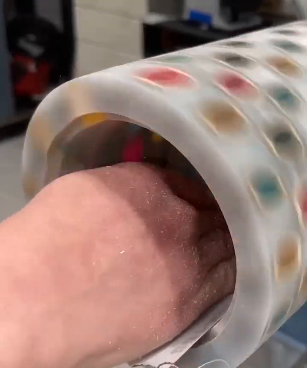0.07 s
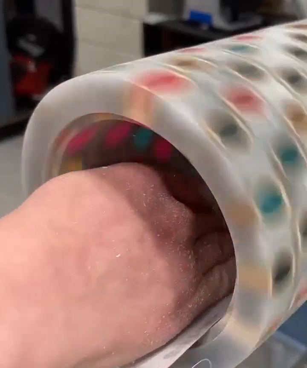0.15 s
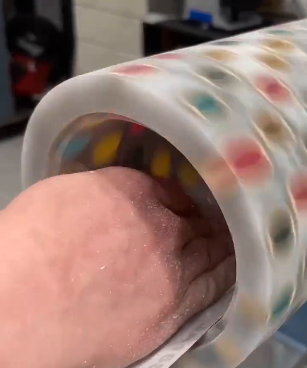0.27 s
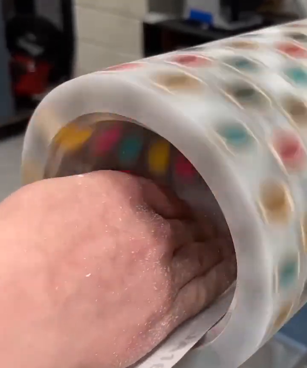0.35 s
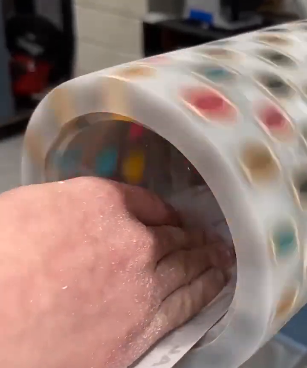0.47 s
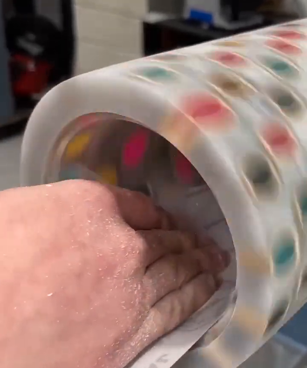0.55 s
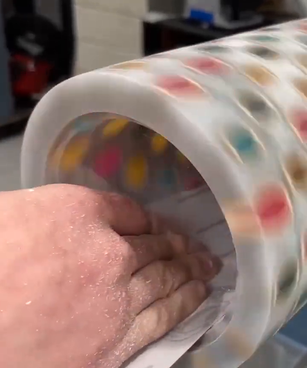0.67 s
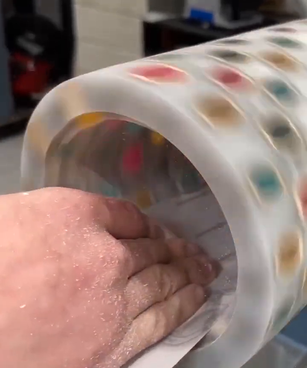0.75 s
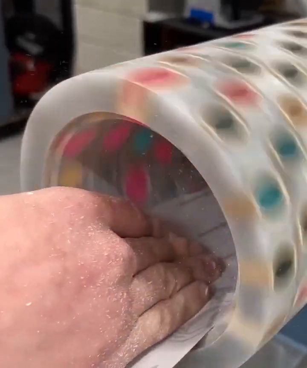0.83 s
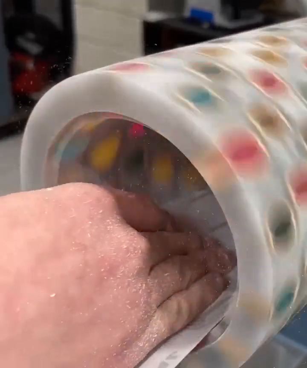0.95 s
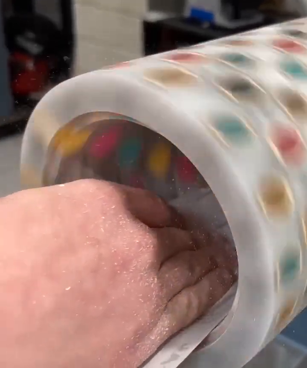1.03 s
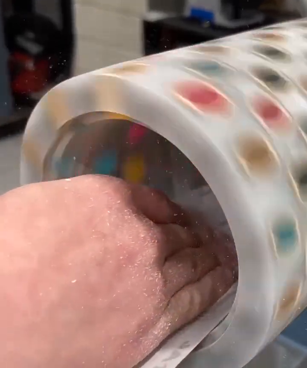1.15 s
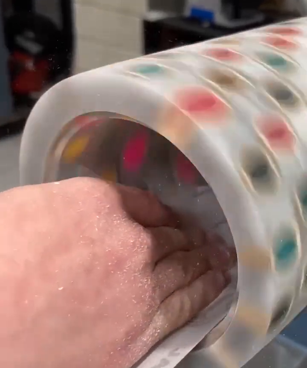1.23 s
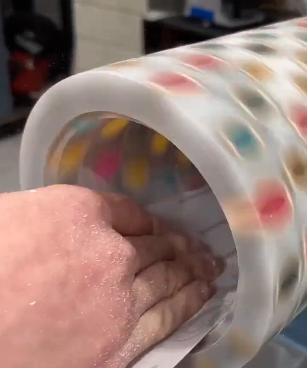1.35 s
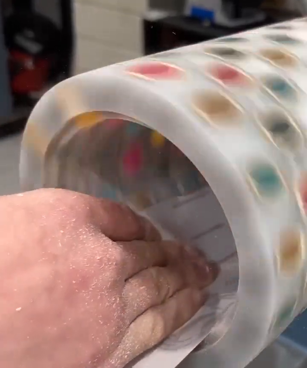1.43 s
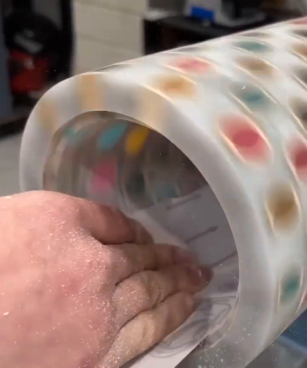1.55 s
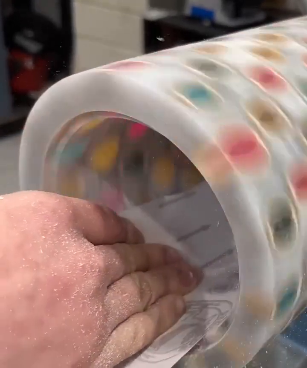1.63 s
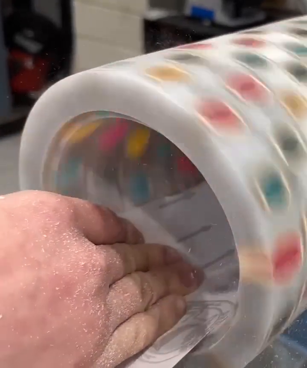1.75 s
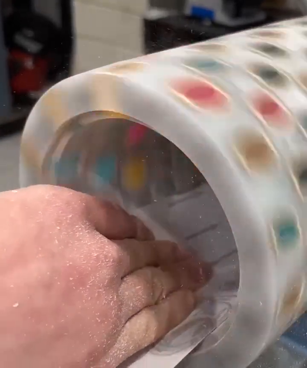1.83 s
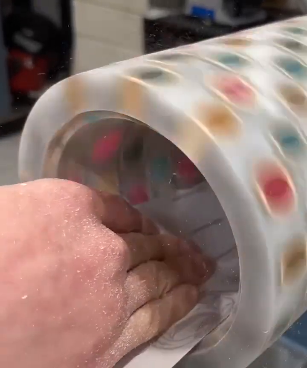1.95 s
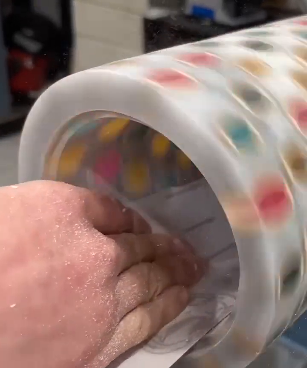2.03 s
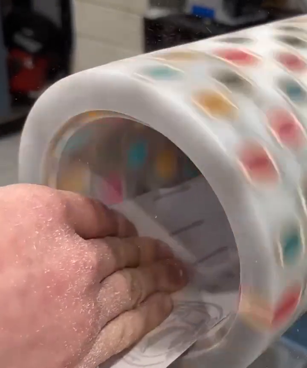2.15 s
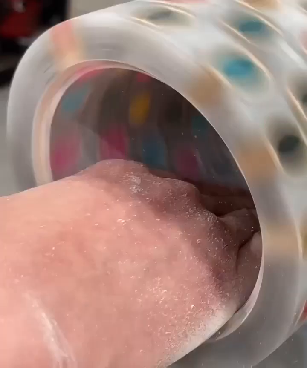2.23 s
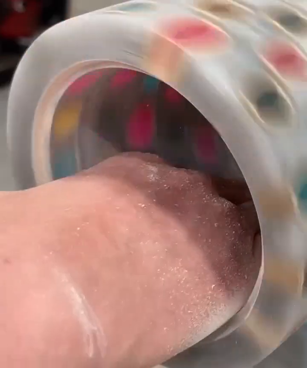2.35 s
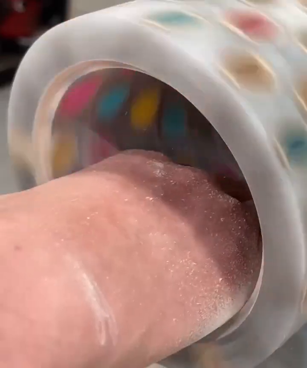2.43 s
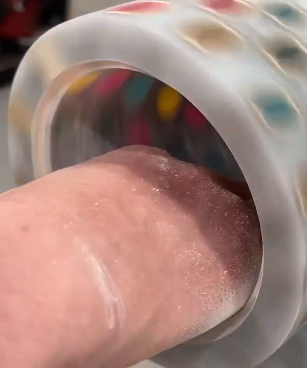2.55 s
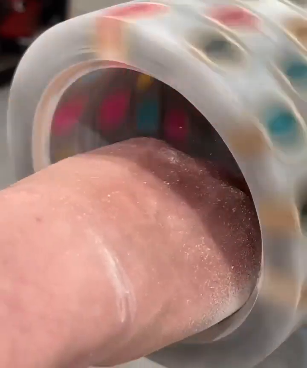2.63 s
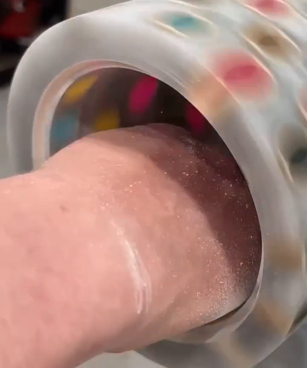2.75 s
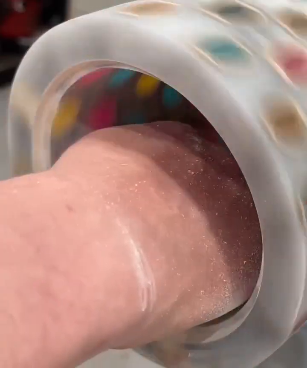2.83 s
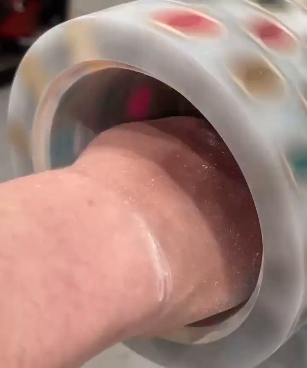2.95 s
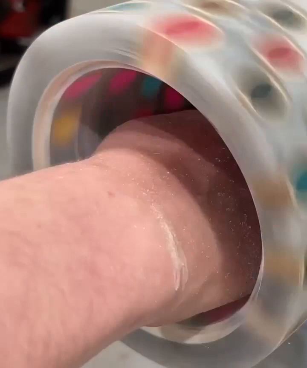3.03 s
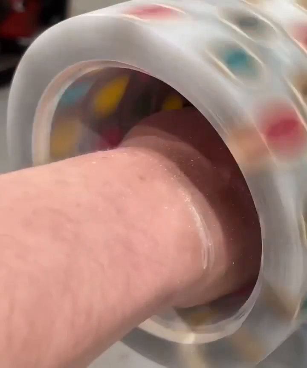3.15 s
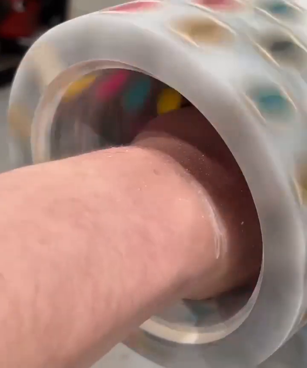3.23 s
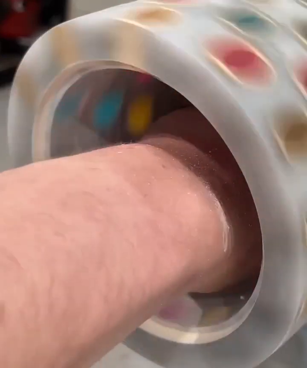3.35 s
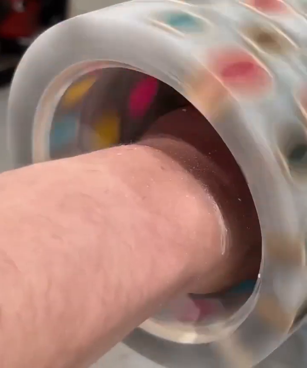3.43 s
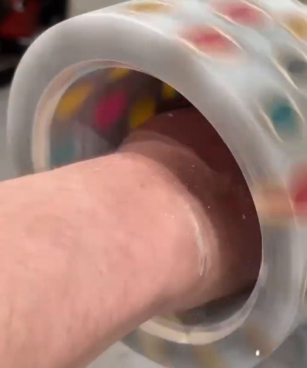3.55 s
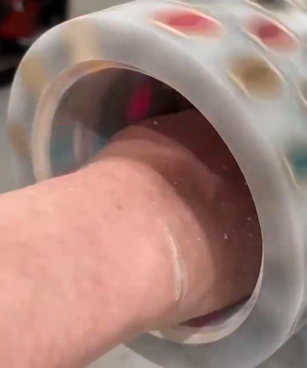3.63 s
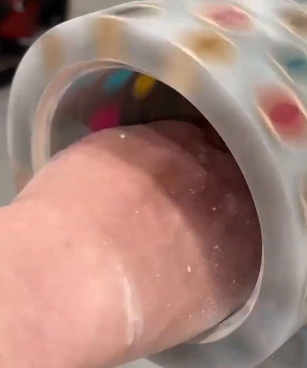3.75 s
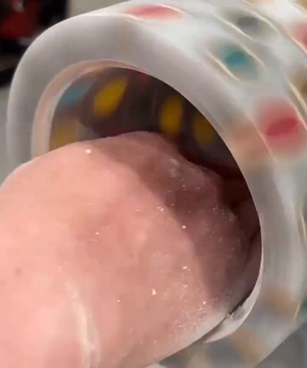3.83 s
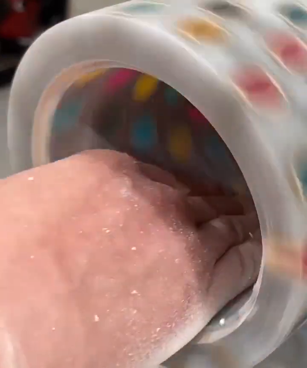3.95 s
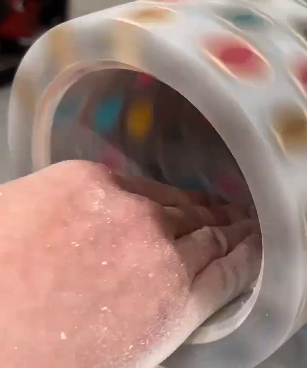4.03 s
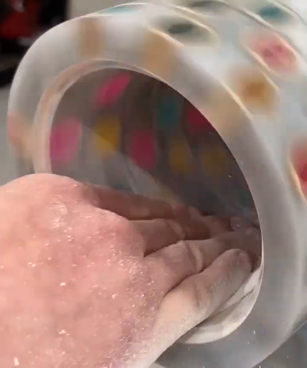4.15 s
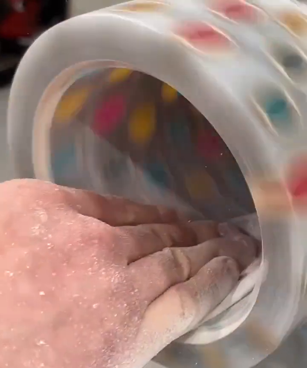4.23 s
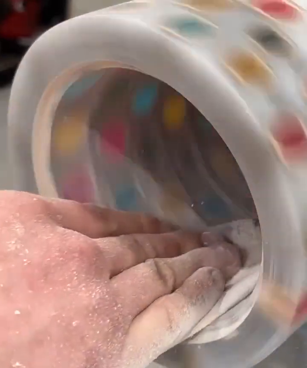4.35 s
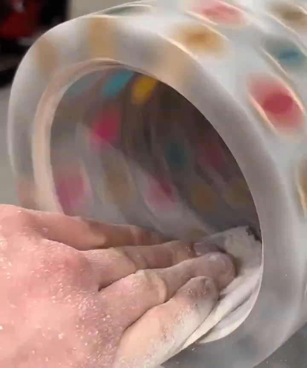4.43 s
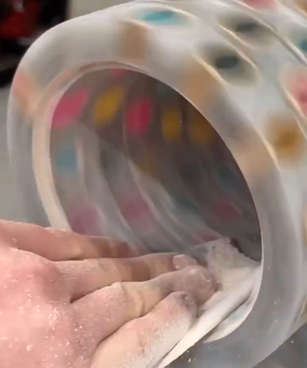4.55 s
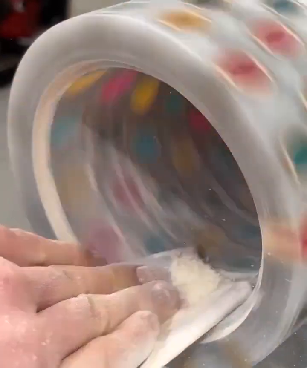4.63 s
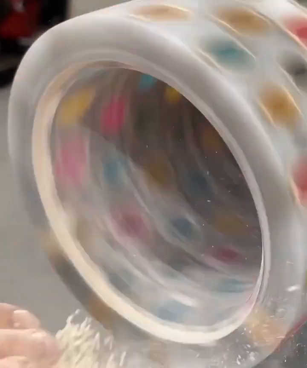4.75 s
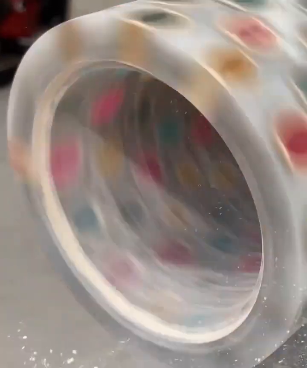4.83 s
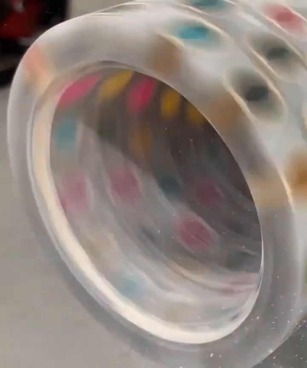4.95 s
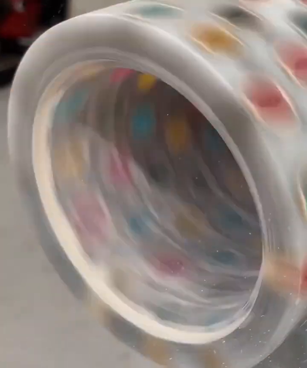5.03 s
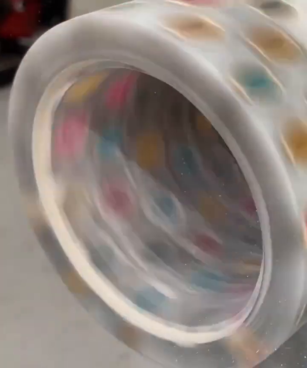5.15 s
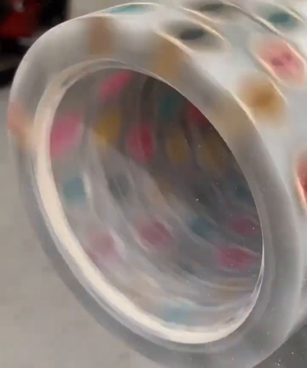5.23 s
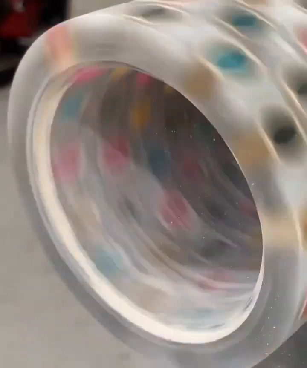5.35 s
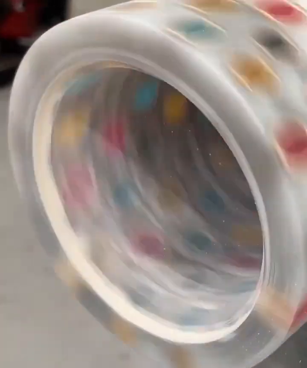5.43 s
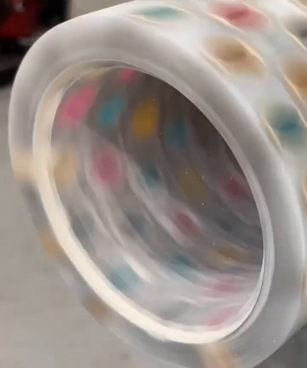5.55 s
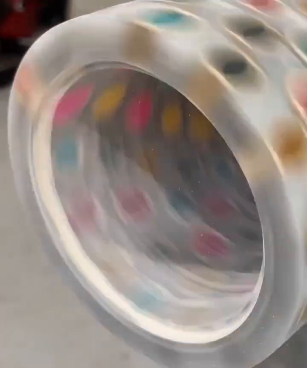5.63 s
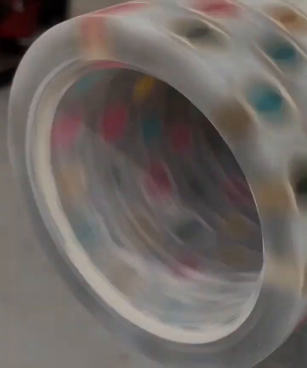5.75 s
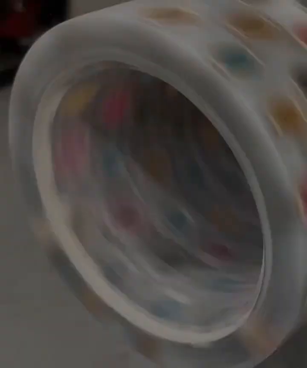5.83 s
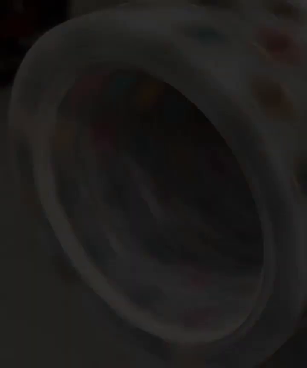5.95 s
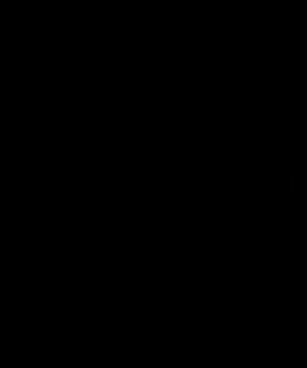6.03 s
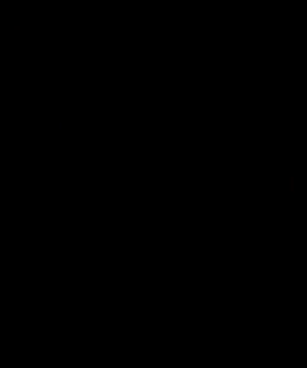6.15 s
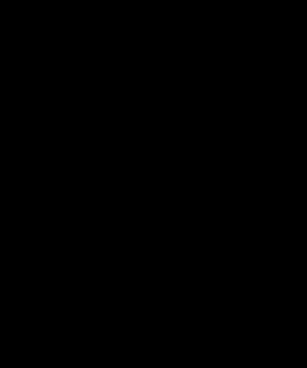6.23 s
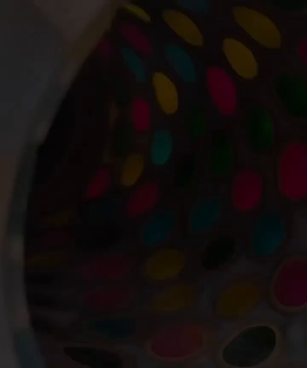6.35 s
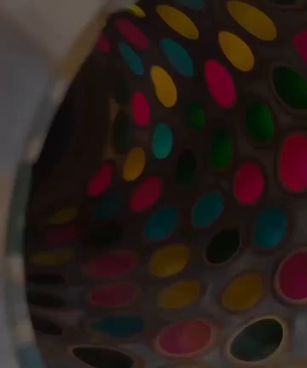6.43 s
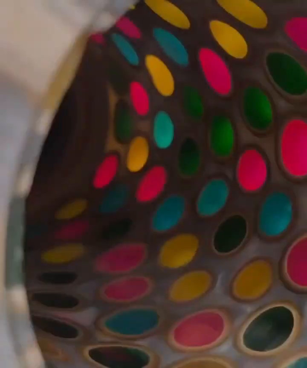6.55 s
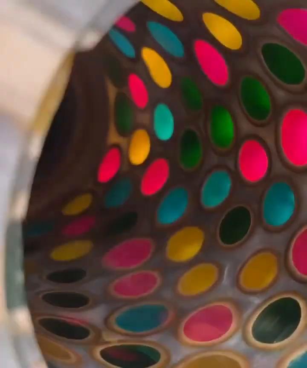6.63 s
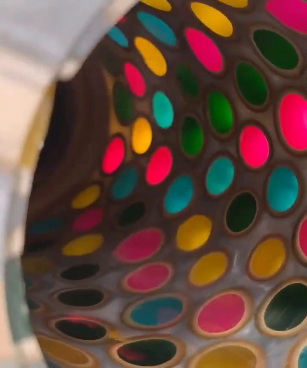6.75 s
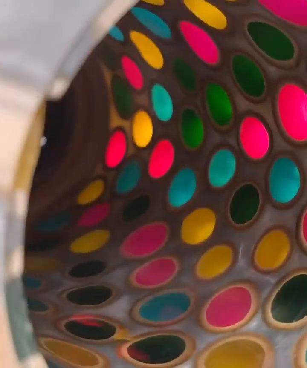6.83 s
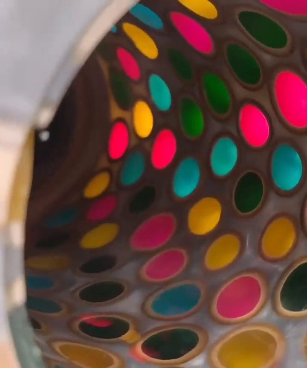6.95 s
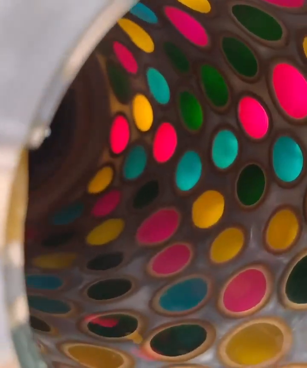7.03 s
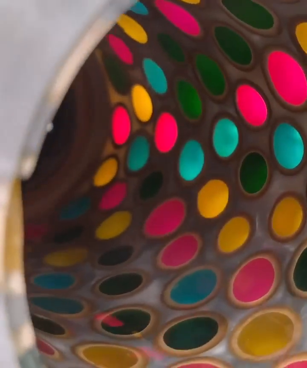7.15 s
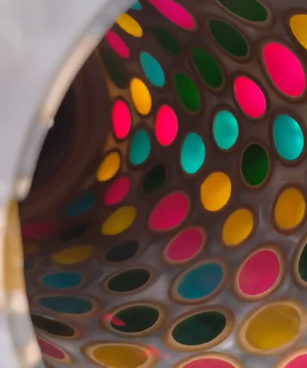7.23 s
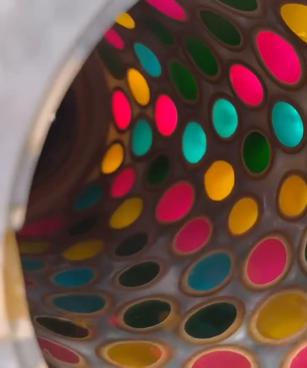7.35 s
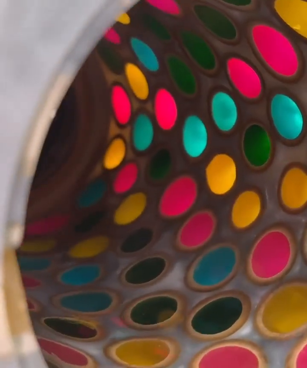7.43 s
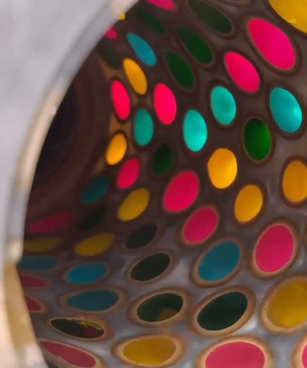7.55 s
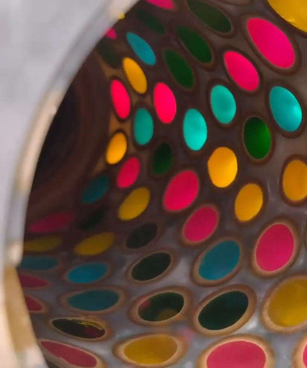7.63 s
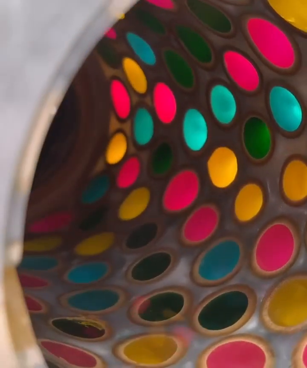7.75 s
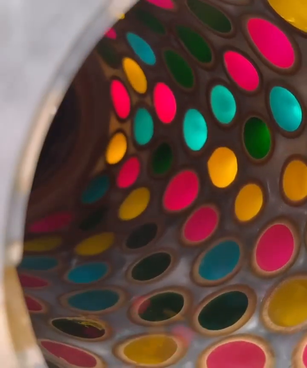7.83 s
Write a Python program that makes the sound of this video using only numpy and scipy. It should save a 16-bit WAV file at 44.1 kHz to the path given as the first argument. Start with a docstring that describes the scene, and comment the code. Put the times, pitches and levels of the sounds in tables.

```python
"""Sanding inside a spinning vase

A hand presses sandpaper inside a hollow resin vase on a lathe: random grain contacts make the hiss, and
noise-driven resonances of air and wall colour it as the arm goes in and out. Decaying modes knock as the
paper leaves the rim; motor orders throb on with the drive's thin whine. The lathe fades out under a few
rustles of enveloped noise, ticks and soft bumps, leaving a workshop fan's blade tone and octave over room noise."""
import sys
import numpy as np
from scipy import signal
from scipy.fft import rfft, irfft, next_fast_len
from scipy.io import wavfile
from scipy.ndimage import uniform_filter1d, map_coordinates

SR = 44100
rng = np.random.default_rng(int(sys.argv[2]) if len(sys.argv) > 2 else 0)


def pcm_store(signal):
    """Save signal as 16-bit PCM."""
    levels = np.round(np.clip(np.atleast_2d(signal), -1, 1) * 32767)
    wavfile.write(sys.argv[1], SR, levels.astype(np.int16).T)


N = 347489
LIFT_S = 4.73  # the paper leaves the wall
# level of the mouth tone, with its random swells and dips: (time [s], reference level [dB])
MOUTH_LEVEL = [(0.02, -33.5), (0.22, -35), (0.29, -39.5), (0.39, -30.5), (0.57, -36), (0.74, -30.5),
               (1.06, -37), (1.33, -32), (1.6, -37.5), (1.7, -41.5), (1.84, -41.5), (1.94, -30.5),
               (2.08, -38.5), (2.17, -44.5), (2.26, -43.5), (2.32, -54.5), (2.38, -45), (2.63, -43),
               (2.71, -56.5), (2.78, -41.5), (2.85, -52), (3.15, -45.5), (3.29, -57.5), (3.4, -48),
               (3.55, -51), (3.75, -43.5), (3.83, -54.5), (3.97, -43.5), (4.2, -52), (4.66, -46),
               (4.71, -39)]


def amp(db):
    """Level is logarithmic: decibels to amplitude gain."""
    return 10 ** (np.asarray(db) / 20)


def unit(x):
    """Normalization: the mean of the channels is scaled to rms 1."""
    mono = np.atleast_2d(x).mean(axis=0)
    return x / np.sqrt(np.mean(mono ** 2) + 1e-20)


def along(points, hz):
    """Interpolation of (frequency, value) points on a logarithmic frequency axis."""
    f, v = np.transpose(points)
    return np.interp(np.log(hz + 1), np.log(f + 1), v)


def clock():
    """Sampled time: the instant of each sample in seconds."""
    return np.arange(N) / SR


def curves(rows):
    """Linear interpolation in time: one curve for each column after the time."""
    s, *cols = np.transpose(rows)
    return [np.interp(clock(), s, c) for c in cols]


def wobble(rate):
    """Band-limited randomness: a smooth curve through normal random knots, rate of them a second."""
    knots = rng.standard_normal(int(N * rate / SR) + 4)
    return map_coordinates(knots, [np.arange(N) * rate / SR])


def filtered(x, response):
    """Linear filtering: the spectrum of x is multiplied by a response of frequency."""
    m = next_fast_len(N + SR // 4)
    hz = np.fft.rfftfreq(m, 1 / SR)
    return irfft(rfft(x, m) * response(hz), m)[..., :N]


def white():
    """White noise: two uncorrelated channels with equal power at all frequencies."""
    return rng.standard_normal((2, N))


def coloured(x, spectrum):
    """Spectral shaping: x is filtered by (frequency [Hz], gain [dB]) points."""
    return filtered(x, lambda hz: amp(along(spectrum, hz)))


def placed(pair, alike, side):
    """Interchannel coherence: two unrelated signals mix to a given likeness and level difference."""
    def mixing(hz):
        angle = np.arccos(np.clip(along(alike, hz), -1, 1)) / 2
        return np.array([np.cos(angle), np.sin(angle)])

    common, opposed = filtered(pair, mixing)
    stereo = np.array([common + opposed, common - opposed])
    return unit(filtered(stereo, lambda hz: amp(np.outer([.5, -.5], along(side, hz)))))


def near(pair):
    """A near source: sound from the vase's mouth has its own stereo coherence and balance."""
    # likeness of the channels: (frequency [Hz], coherence [-1 to 1])
    near_alike = [(100, 1), (300, .99), (600, .78), (1150, .5), (1500, .28), (3500, .25), (4400, .75),
                  (5000, .88), (6000, .58), (7200, .48), (7900, .85), (8700, .45), (10600, .15),
                  (12200, .92), (13500, .55), (15000, .4)]
    # balance: (frequency [Hz], left minus right [dB])
    near_side = [(400, -0.5), (750, 6.5), (1400, 6.5), (2300, 5.5), (3400, 9), (4500, 1.5), (6500, 2.5),
                 (8200, 0), (15000, 0.5)]
    return placed(pair, near_alike, near_side)


def far(pair):
    """A diffuse field: sound spread through the workshop loses coherence in the treble."""
    # likeness of the channels: (frequency [Hz], coherence [-1 to 1])
    far_alike = [(70, 1), (290, 0.44), (640, 0.63), (1400, .05), (15000, .1)]
    # balance: (frequency [Hz], left minus right [dB])
    far_side = [(100, 0), (350, 0.5), (1200, -0.5), (4400, 3.5), (15000, 0.5)]
    return placed(pair, far_alike, far_side)


def led(pair, lead):
    """Interchannel phase: the left leads the right by (frequency [Hz], phase [rad]) points."""
    return filtered(pair, lambda hz: np.exp(1j * np.outer([.5, -.5], along(lead, hz))))


def resonance(centre_hz, width):
    """A noise-driven resonance: slow noise modulates a carrier; gain halves width Hz off centre."""
    phase = 2 * np.pi * np.cumsum(centre_hz * np.ones(N)) / SR

    def swell():
        return filtered(white(), lambda hz: 1 / (1 + (hz / width) ** 2))

    return swell() * np.cos(phase) + swell() * np.sin(phase)


def tone(hz, drift, waver_db):
    """An unsteady oscillation: a sine, rms 1 before its level wavers, drifts randomly in pitch."""
    phase = 2 * np.pi * np.cumsum(hz + drift * wobble(8)) / SR
    return np.sqrt(2) * np.sin(phase) * amp(waver_db * wobble(9.9))


def scratches(rate, spread_db, clump_db, smooth):
    """Random impacts: grit catches at random, rate times a second, over a smooth rub."""
    caught = rng.random((2, N)) < rate / SR
    grains = caught * white() * amp(spread_db * white())
    clumps = amp(clump_db * wobble(2500))  # sub-millisecond
    return (unit(grains) + smooth * unit(white())) * clumps


def steadied(x, span):
    """Power normalization: the slow swells of a noise are evened out over span seconds."""
    power = uniform_filter1d(np.mean(x ** 2, axis=0), max(int(span * SR), 2))
    return x / np.sqrt(np.abs(power) + 1e-9)


def hollow(x, depth_db, spacing_hz, drift):
    """Modal coloration: the vase's dense modes carve peaks and dips that drift as the hand moves."""
    hz, t, z = signal.stft(x, SR, nperseg=2048)
    grid = np.array(np.meshgrid(hz / spacing_hz, t * drift, indexing="ij"))

    def ripple():
        return map_coordinates(rng.standard_normal((512, 64)), grid, mode="mirror")

    field = ripple() + np.array([ripple(), ripple()]) / 2  # shared part, then each channel's own
    gain = amp(depth_db * np.tanh(field / 2) * 2)
    return unit(signal.istft(z * gain, SR, nperseg=2048)[1][:, :N])


def lifted():
    """Two-stage decay: when the paper lifts the rub falls quickly into the workshop's tail."""
    after = np.maximum(clock() - LIFT_S, 0)
    rub = amp(-340 * after)  # dB per second
    tail = amp(-10 - 128 * after)  # dB, dB per second
    return np.maximum(rub, tail)


def swing(db):
    """Relative level: the departure in dB from the mean before the paper lifts."""
    return db - db[clock() < LIFT_S].mean()


def sanding():
    """Friction noise: pressed grit hisses on the spinning wall, with more fizz and rasp deep inside."""
    # how hard the paper is pressed: (time [s], reference level of the hiss [dB])
    pressure = [(0.0, -23), (0.04, -23), (0.6, -24), (0.64, -23), (1.08, -25), (1.26, -24), (1.78, -24),
                (1.83, -23.5), (1.9, -22.5), (2.23, -24), (2.35, -27), (2.92, -27.5), (3.22, -25.5),
                (3.6, -25.5), (3.72, -27), (3.85, -25.5), (4.35, -25), (4.47, -26.5), (4.54, -28),
                (4.62, -27), (4.72, -29.5)]
    # how far the arm reaches into the vase: (time [s], share [0-1])
    reach_path = [(0, 0.37), (.5, 0.03), (2.25, 0), (2.33, 0.76), (2.7, 0.89), (3.6, 0.9), (4.0, 0.64),
                  (4.6, 0.76)]
    # colours of the layers: (frequency [Hz], density [dB per Hz])
    grit_colour = [(1200, -48), (2400, -8.5), (3300, -4.5), (4000, -3.5), (4700, -0.5), (5600, 0),
                   (7000, -0.65), (8000, -4), (8700, -13), (11000, -34.5)]
    fizz_colour = [(5500, -32), (7400, -10.5), (8000, -18.5), (8600, 2.5), (9200, 1.5), (9800, -2),
                   (10700, -3.5), (11300, -7.5), (13000, -5), (15500, -4.5)]
    rasp_colour = [(600, -27), (950, -6.5), (1250, -3.5), (1520, 3), (1800, 2), (2050, 0.5), (2400, -0.5),
                   (2900, 0.5), (3300, 2), (5000, -16.5), (9000, -41.5)]
    scrub_colour = [(30, -37), (70, -14), (170, 0.5), (390, 4.5), (480, 7.5), (650, 4.5), (850, 9.5),
                    (1300, -12.5), (2600, -28)]
    press_db, = curves(pressure)
    reach, = curves(reach_path)
    mouth_level_db, = curves(MOUTH_LEVEL)
    flutter_db = 0.45 * wobble(20) + 0.15 * wobble(70)  # under the fingers

    # just before the lift the finest fizz thins out
    ease_s, ease_db_per_s = 4.637, 86
    eased_db = ease_db_per_s * np.clip(clock() - ease_s, 0, LIFT_S - ease_s)
    hiss_db = press_db - 0.22
    fizz_db = press_db - 4 + 5 * reach - eased_db
    rasp_db = press_db - 12.5 + 2.5 * reach
    # the scrub partly follows the mouth tone's level, and the arm muffles it
    scrub_db = -45 + 0.359 * swing(mouth_level_db) - 9.5 * reach

    grains = near(scratches(rate=11000, spread_db=0.5, clump_db=-0.9, smooth=1.0))
    grit = hollow(grains, depth_db=3.6, spacing_hz=65, drift=8)
    catches = scratches(rate=1800, spread_db=0.5, clump_db=0.5, smooth=0.89)
    coarse = near(coloured(catches, rasp_colour)) * amp(0.93 * wobble(45))
    hiss = amp(hiss_db) * unit(coloured(grit, grit_colour))
    fizz = amp(fizz_db) * unit(coloured(grit, fizz_colour))
    rasp = amp(rasp_db) * hollow(coarse, depth_db=4.5, spacing_hz=55, drift=7)
    scrub = amp(scrub_db) * unit(coloured(grains, scrub_colour))
    return (hiss + fizz + rasp + scrub) * amp(flutter_db) * lifted()


def vase():
    """Forced vibration: rubbing shakes the wall and sounds the air inside like a blown bottle."""
    # how hard the paper shakes the wall: (time [s], reference level of its hum [dB])
    shake = [(0, -54.5), (.25, -51), (.46, -44.5), (.68, -54.5), (.97, -57.5), (1.12, -41.5), (1.38, -53.5),
             (1.77, -49), (1.9, -54), (2.25, -50.5), (2.32, -43), (2.6, -43.5), (2.75, -46.5),
             (3.05, -45.5), (3.55, -48.5), (3.68, -41.5), (4.0, -48), (4.35, -41.5), (4.6, -41.5),
             (4.72, -52)]
    # pitch of the mouth, rising as the hand uncovers it: (time [s], frequency [Hz])
    mouth_path = [(0, 281), (.4, 283.7), (.8, 280.2), (1.4, 286.3), (2, 281.2), (2.5, 289.5), (3.2, 295),
                  (3.7, 284), (4.1, 304.5), (4.5, 297.6), (4.75, 322)]
    # air mode along the vase, higher as the arm shortens the column:
    # (time [s], frequency [Hz], level [dB])
    ring = [(0, 925, -39), (0.3, 915, -40.5), (0.6, 892, -42), (1.3, 900, -41.5), (1.45, 870, -49.5),
            (2.25, 870, -49.5), (2.4, 928, -48), (2.9, 940, -47), (3.5, 950, -47), (4.1, 925, -50),
            (4.5, 905, -48), (4.7, 900, -46.5)]
    # low wall modes: (frequency [Hz], level relative to the shake [dB], drift [Hz], waver [dB])
    wall_modes = [(95.6, -3.5, 1.1, 2), (115, -9, 5, 4)]
    # rumble around the wall's hum: (frequency [Hz], density [dB per Hz])
    rumble_colour = [(20, -45.5), (40, -24), (66, -12.5), (80, -14.5), (96, 1), (108, 2), (122, 1.5),
                     (140, -9), (180, -8.5), (230, -39)]
    mouth_level_db, = curves(MOUTH_LEVEL)
    shake_db, = curves(shake)
    mouth_hz, = curves(mouth_path)
    length_hz, length_db = curves(ring)

    modes = sum(amp(db) * tone(hz, drift, waver_db) for hz, db, drift, waver_db in wall_modes)
    wall = amp(shake_db) * modes
    rumble_db = -53 + 0.6 * swing(shake_db)
    rumble = amp(rumble_db) * near(coloured(white(), rumble_colour))

    mouth_db = mouth_level_db - 1.2 + 0.5 * wobble(18)
    core = steadied(near(resonance(mouth_hz, width=5.7)), span=0.04)
    skirt = amp(-6.5) * near(resonance(mouth_hz + 21, width=23))  # a breathier edge above the note
    balance = amp([[.6], [-.6]])  # dB, left louder than right
    mouth = amp(mouth_db) * steadied(core + skirt, span=0.12) * balance
    length = amp(length_db) * near(resonance(length_hz, width=36))

    # a broad scrape that dies as the paper seats itself
    seat_db = -34 - 24 * clock()
    seat = amp(seat_db) * near(resonance(1080, width=230))
    return (wall + rumble + mouth + length + seat) * lifted()


def gap():
    """Cavity resonance: two modes of the air between hand and wall glide as the hand shifts."""
    # lower, then upper mode: (time [s], frequency [Hz], level [dB])
    lower_path = [(0, 1190, -36.5), (.3, 1206, -42.5), (.65, 1213, -44.5), (1.3, 1205, -41),
                  (1.5, 1460, -44.5), (2.15, 1463, -41), (2.35, 1322, -46.5), (2.7, 1290, -45),
                  (3.1, 1120, -44.5), (3.55, 1119, -45), (3.8, 1260, -41), (3.95, 1567, -40),
                  (4.15, 1600, -47.5), (4.7, 1648, -47.5)]
    upper_path = [(0, 1900, -46), (.45, 1950, -38), (.7, 1955, -42.5), (1.25, 2013, -38), (1.42, 2107, -52),
                  (1.6, 2838, -45), (2.05, 2770, -42), (2.2, 2393, -46.5), (2.33, 1647, -40),
                  (2.8, 1623, -42.5), (3.2, 1770, -43), (3.6, 1877, -42), (3.82, 1817, -36.5),
                  (4.1, 1934, -44.5), (4.7, 1953, -44)]

    def mode(path, width):
        centre_hz, db = curves(path)
        air = near(resonance(centre_hz, width))
        return amp(db) * hollow(air, depth_db=4.0, spacing_hz=50.26, drift=4.04)

    return (mode(lower_path, width=104) + mode(upper_path, width=160)) * lifted()


def lathe():
    """Rotating machinery: motor orders, air dragged by the spinning work, and the drive's whine."""
    # gain of the whole lathe: (time [s], level [dB])
    running = [(0, -4), (4.9, 2.5), (5.9, -1.5), (6.2, -3.5), (6.4, -13), (6.6, -29), (6.8, -72)]
    # the motor labours under the hand, before the running gain:
    # (time [s], first order [dB], second order [dB], third order [dB])
    orders = [(0, -78, -61, -58), (2.2, -75, -66, -55), (2.35, -69, -55.5, -59), (4.6, -66, -58.5, -55.5),
              (4.9, -65, -62.5, -55.5), (6.2, -78, -63, -54)]
    # switching tones and sidebands, before trim and running gain: (frequency [Hz], level [dB])
    drive = [(6988, -69.5), (7079, -71), (7289, -81), (14061, -71), (14223, -76.5), (14492, -71)]
    # dragged air: (frequency [Hz], density [dB per Hz])
    windage = [(25, -11.5), (55, 4.5), (70, 15), (95, 6), (140, 4), (210, 9), (330, 2), (650, -11),
               (1100, 2), (1900, 0.5), (2900, -9.5), (6000, -23.5), (10000, -20), (13000, -26.5),
               (15000, -31)]
    motor_hz = 88.6
    turn_s, crest_s, throb_share = .1352, 5.382, 0.43  # spindle turn, a throb crest, depth (0-1)
    run_db, = curves(running)
    first_db, second_db, third_db = curves(orders)

    # the third order beats once a turn
    turning = np.exp(2j * np.pi * (clock() - crest_s) / turn_s)
    third_db = third_db + 20 * np.log10(np.abs(1 + throb_share * turning))
    hum = 0
    for order, db in enumerate([first_db, second_db, third_db], start=1):
        hum = hum + amp(db) * tone(order * motor_hz, drift=1.17, waver_db=0.4)
    hum = hum * amp([[-.3], [.3]])  # dB, right slightly louder

    whine = 0
    for hz, db in drive:
        left = tone(hz, drift=5.0, waver_db=6.0)
        right = tone(hz, drift=3.67, waver_db=2.5)
        whine = whine + amp(db - 0.5) * np.array([left, right])
    # noise bands around and below the whine
    fizz = amp(-72.0) * unit(resonance(7020, width=170))
    fizz = fizz + amp(-66.5) * unit(resonance(14380, width=200))
    fizz = fizz + amp(-69.0) * unit(resonance(13750, width=160))
    air = amp(-55.5) * far(coloured(white(), windage))
    return amp(run_db) * (hum + whine + fizz + air)


def workshop():
    """Blade-passing tone: a fan's fundamental and octave stand over the rush of the room."""
    # blade tone: (time [s], level [dB])
    fan = [(0, -56), (2.1, -61), (2.5, -57), (4.6, -57), (4.85, -53), (5.9, -53), (6.35, -55),
           (6.48, -58.5), (6.56, -59), (6.61, -54), (6.69, -53), (6.77, -61), (6.84, -60.5), (6.9, -55),
           (7.1, -52.5), (7.88, -51.5)]
    # rush of the room: (frequency [Hz], density [dB per Hz])
    room = [(25, -14.5), (65, -1.5), (100, -6), (200, -3.5), (420, -9.5), (620, -1), (760, -4),
            (1030, -10.5), (1400, -9), (1800, -8), (2050, -18.5), (4000, -20.5), (7000, -24.5),
            (10000, -35.5), (15000, -54)]
    fan_hz = 620.5
    tone_db, = curves(fan)
    octave_db = -62 - 3 * (N / SR - clock())  # emerges slowly, 3 dB per second
    blade = amp(tone_db) * tone(fan_hz, drift=.8, waver_db=.8)
    breath = amp(-3.5) * far(resonance(1195, width=22))
    octave = amp(octave_db) * (tone(2 * fan_hz, drift=2, waver_db=2.5) + breath)
    octave = octave * amp([[2], [-2]])  # dB, left louder than right
    rumble = amp(-67.5) * far(resonance(67.5, width=8))
    rush = amp(-59.5) * far(coloured(white(), room))
    return blade + octave + rumble + rush


def bumps():
    """Band-limited transients: soft bumps are filtered noise under Gaussian envelopes."""
    # (centre time [s], frequency [Hz], bandwidth [Hz], peak level [dB], Gaussian deviation [s])
    soft = [(4.718, 315, 140, -42, 0.024), (4.704, 843, 160, -43, 0.006), (4.732, 830, 150, -39, 0.009),
            (5.018, 637, 400, -51.5, 0.021), (5.182, 68, 11, -46, 0.028), (6.008, 1050, 830, -54, .011)]
    out = 0
    for s, hz, width, db, length in soft:
        band = signal.butter(2, [hz - width / 2, hz + width / 2], "bandpass", fs=SR)
        thud = signal.lfilter(*band, rng.standard_normal((1, N)))
        envelope = np.exp(-.5 * ((clock() - s) / length) ** 2)
        out = out + amp(db) * envelope * steadied(thud, span=0.053)
    return out


def knock():
    """Impulse response: the paper flicks off the rim and the vase rings in decaying modes."""
    # modes: (frequency [Hz], level relative to the knock [dB], 60 dB decay time [s])
    knock_modes = [(150, 0.5, .025), (325, 3, .11), (526, 0.5, 0.022), (860, -1, .025)]
    knock_s, knock_db = 4.743, -31
    t = np.maximum(clock() - knock_s, 0)
    ring = 0
    for hz, db, t60 in knock_modes:
        ring = ring + amp(knock_db + db - 60 * t / t60) * np.sin(2 * np.pi * hz * t)
    return signal.lfilter(*signal.butter(2, 120, "highpass", fs=SR), ring)


def brush(s, length):
    """Attack and decay: a smooth rise to a peak at s, then an exponential fall."""
    t = clock() - s
    rise = (t / (0.43 * length)) ** 2 / 2
    return np.exp(-np.where(t < 0, rise, t / length))


def rustles():
    """Enveloped friction: the freed hand rustles in a crisp and a dull band."""
    # (peak time [s], crisp level [dB], dull level [dB], decay constant [s])
    strokes = [(4.928, -57, -72, 0.018), (5.05, -55, -64, 0.093), (5.613, -62, -78, 0.084),
               (6.003, -60, -56, 0.041), (6.098, -60, -56, 0.09), (6.263, -61.5, -58.5, 0.072),
               (6.304, -71, -61, 0.028), (6.38, -68.5, -82, 0.024)]
    # crisp band: (frequency [Hz], gain [dB])
    crisp_colour = [(200, -8), (500, -8), (1200, -17), (2200, -7), (3200, -4), (6000, -1.5), (10000, -6),
                    (15000, -19)]
    dull_colour = [(150, -11), (400, -1), (1200, 2), (2500, -10), (5000, -38)]
    crisp = sum(amp(db) * brush(s, length) for s, db, _, length in strokes)
    dull = sum(amp(db) * brush(s, length) for s, _, db, length in strokes)
    rub = far(scratches(rate=3000, spread_db=-5.0, clump_db=-1.5, smooth=1.5))
    rub = rub * amp(0.99 * wobble(60))
    return crisp * unit(coloured(rub, crisp_colour)) + dull * unit(coloured(rub, dull_colour))


def ticks():
    """Impulsive excitation: light ticks are noise with an instant onset and exponential decay."""
    # (onset time [s], onset level [dB])
    onsets = [(5.34, -52), (5.465, -45.5)]
    # (frequency [Hz], density [dB per Hz])
    tick_colour = [(800, -14), (1800, 1), (3000, 2), (6000, 1), (9000, -8), (15000, -11)]
    t60_s = 0.034
    t = clock()
    snap = sum(amp(db - 60 * np.abs(t - s) / t60_s) * (t >= s) for s, db in onsets)
    return snap * unit(coloured(white(), tick_colour))


def scene():
    """Superposition: all sources add at the two microphones."""
    # the left microphone hears the vase first: (frequency [Hz], phase lead [rad])
    near_lead = [(100, 0), (290, .33), (600, .85), (1120, .4), (2000, 1.2), (2700, 2.8), (4300, 6),
                 (6600, 6.8), (7800, 9.4), (8700, 12), (14300, 12.8), (15300, 15.6)]
    fan_lead = [(100, 0), (620, -1.07), (1240, -1.9)]  # the fan stands to the right
    work = led(sanding() + vase() + gap() + knock(), near_lead)
    shop = led(workshop(), fan_lead)
    return work + shop + lathe() + bumps() + rustles() + ticks()


def record(dry):
    """Band limitation: the recorder's gain falls to zero over 200 Hz centred on its limit."""
    top_hz = 15600
    return filtered(dry, lambda hz: np.clip((top_hz - hz) / 200 + .5, 0, 1))


dry = scene()
out = record(dry)
pcm_store(out)
```